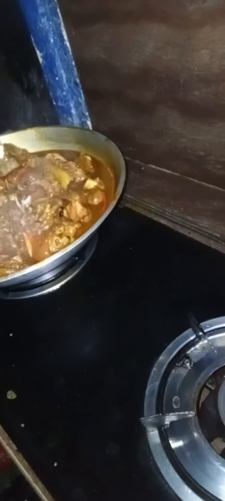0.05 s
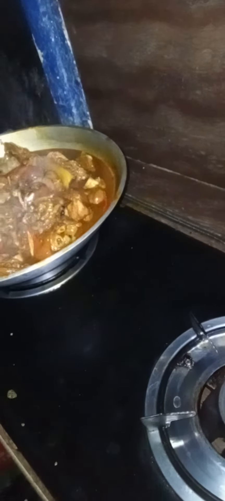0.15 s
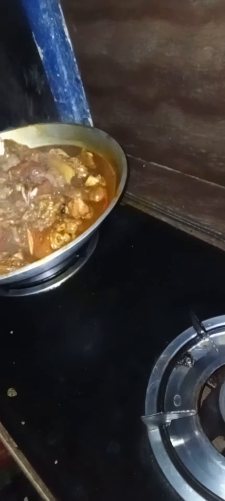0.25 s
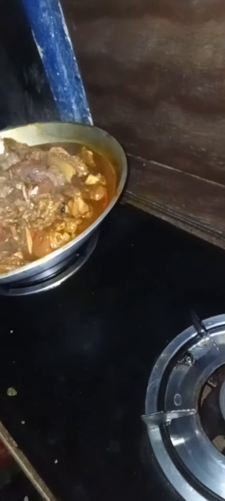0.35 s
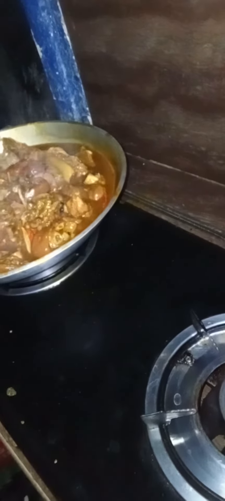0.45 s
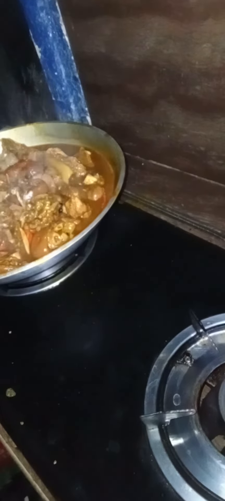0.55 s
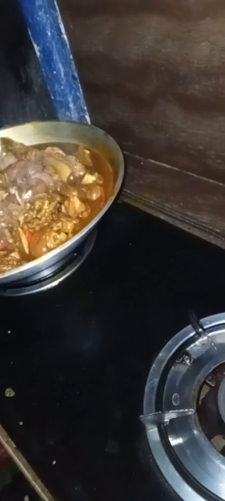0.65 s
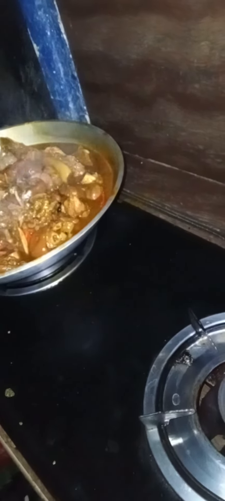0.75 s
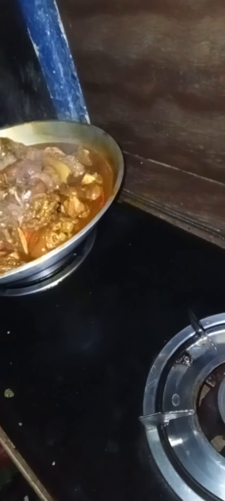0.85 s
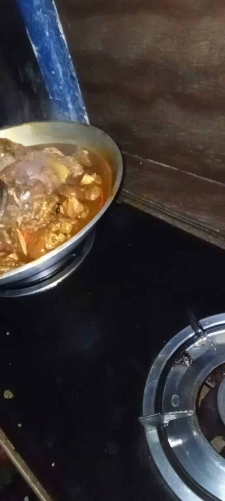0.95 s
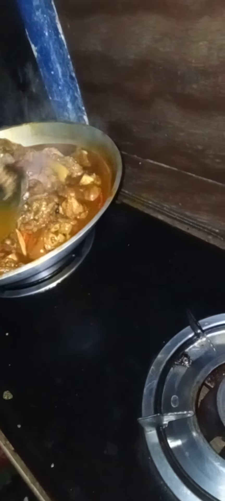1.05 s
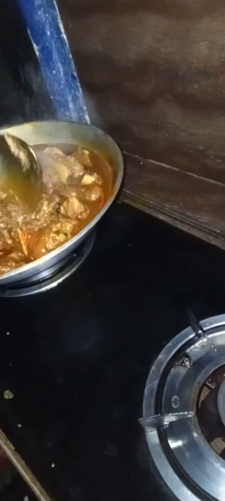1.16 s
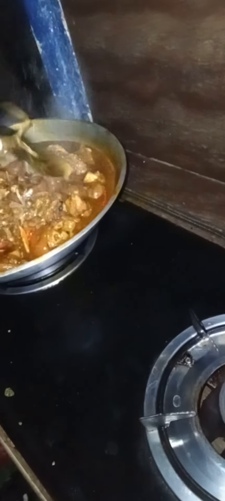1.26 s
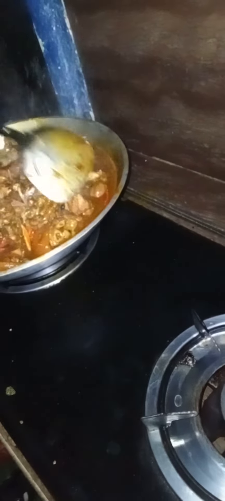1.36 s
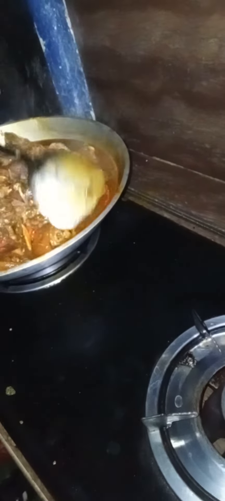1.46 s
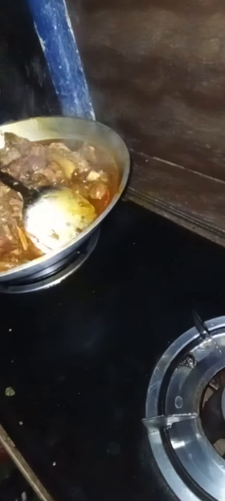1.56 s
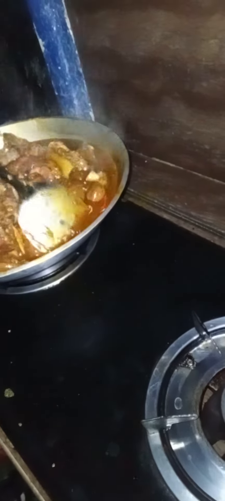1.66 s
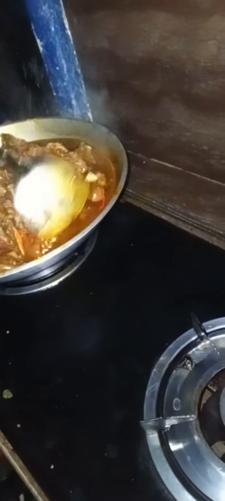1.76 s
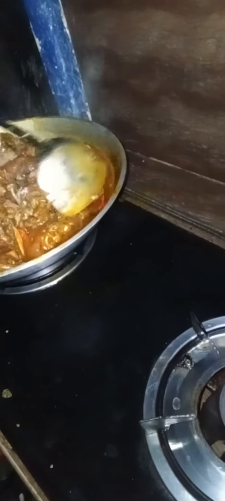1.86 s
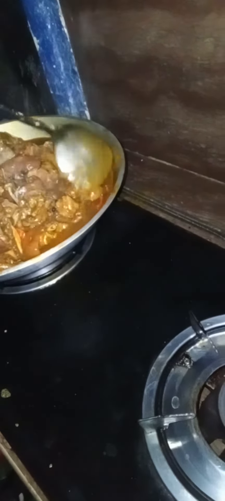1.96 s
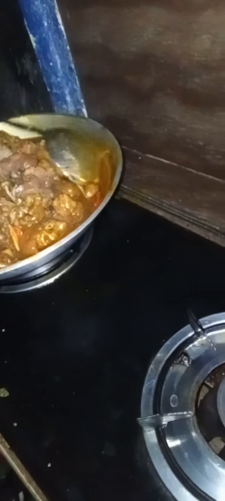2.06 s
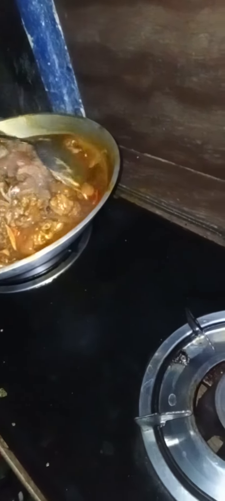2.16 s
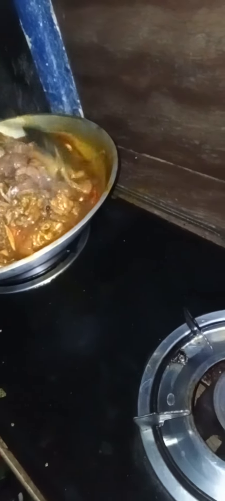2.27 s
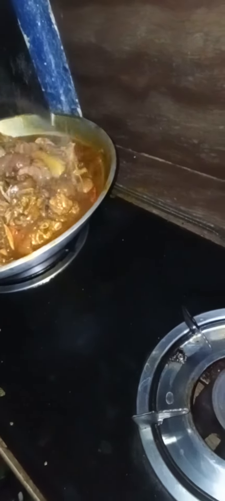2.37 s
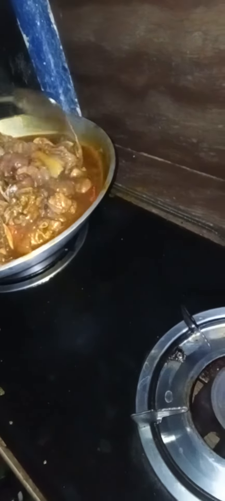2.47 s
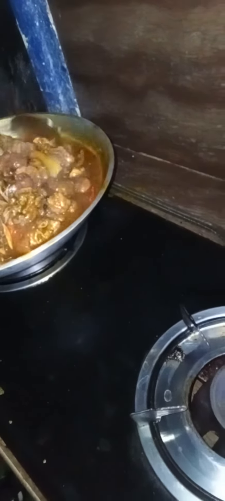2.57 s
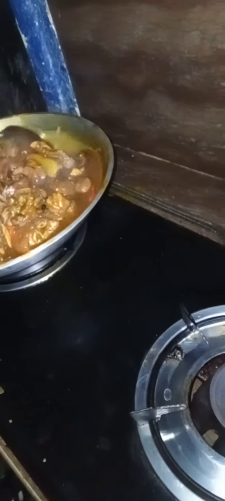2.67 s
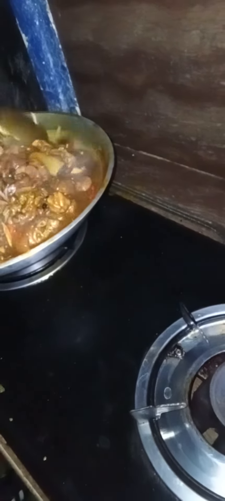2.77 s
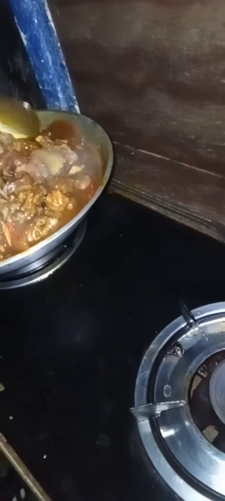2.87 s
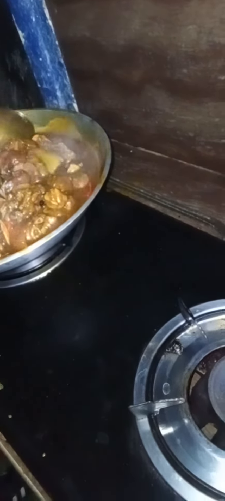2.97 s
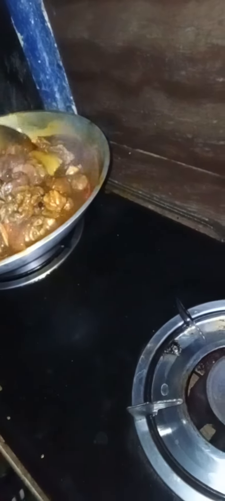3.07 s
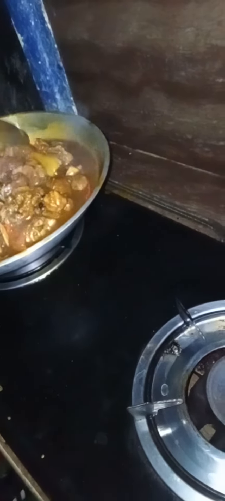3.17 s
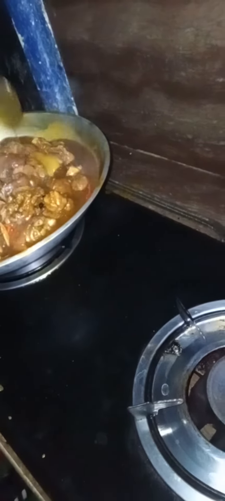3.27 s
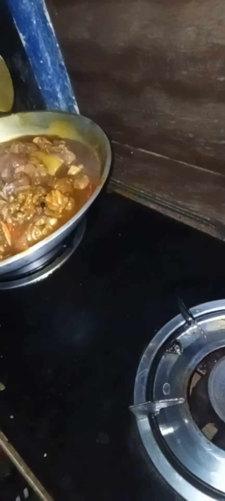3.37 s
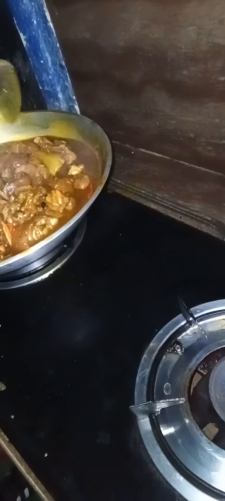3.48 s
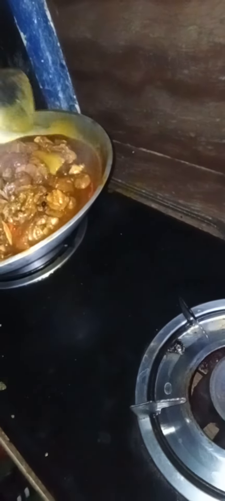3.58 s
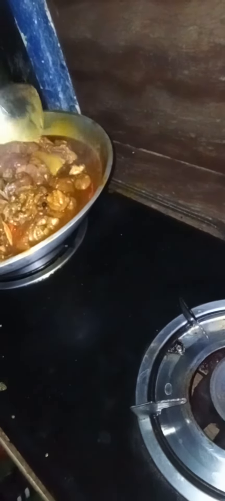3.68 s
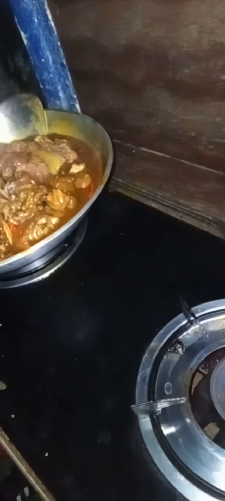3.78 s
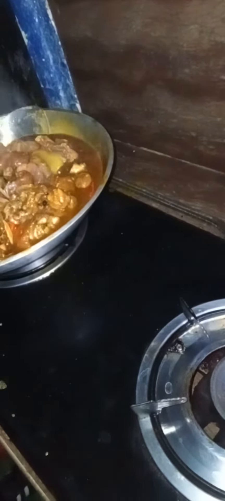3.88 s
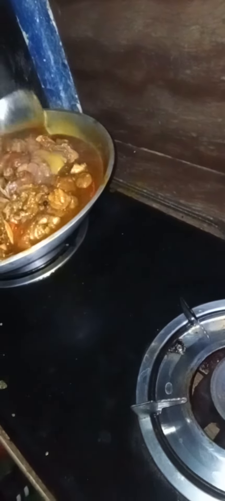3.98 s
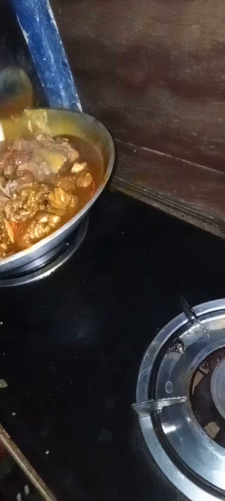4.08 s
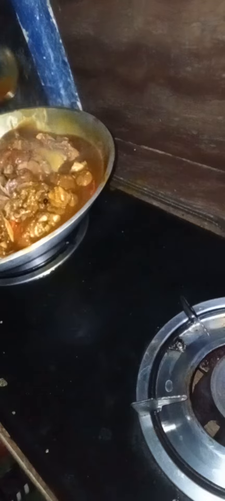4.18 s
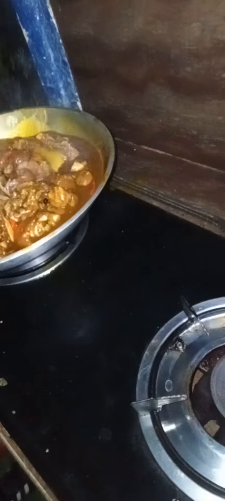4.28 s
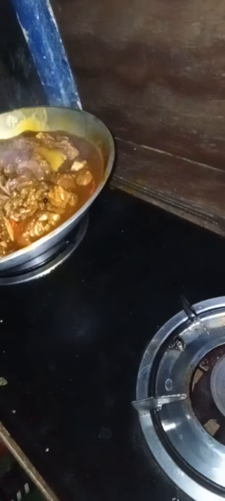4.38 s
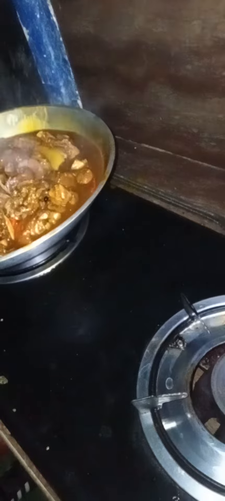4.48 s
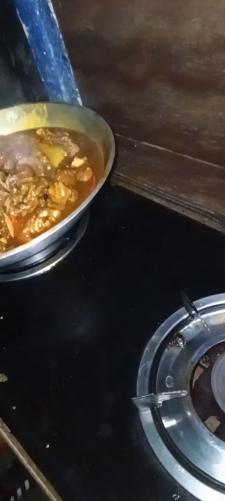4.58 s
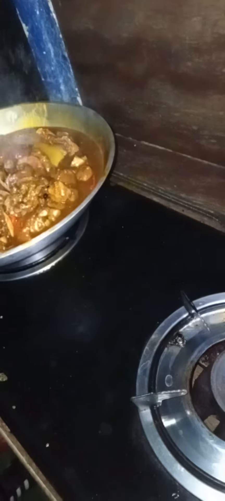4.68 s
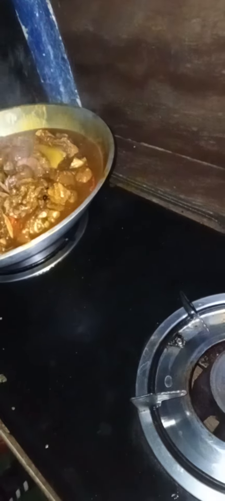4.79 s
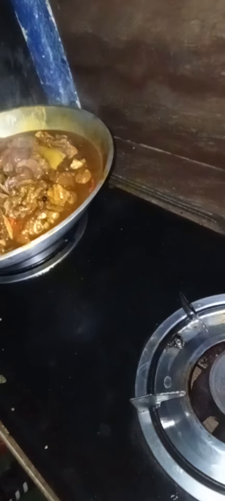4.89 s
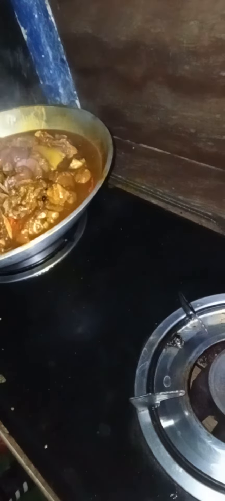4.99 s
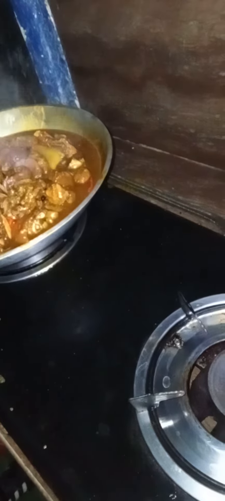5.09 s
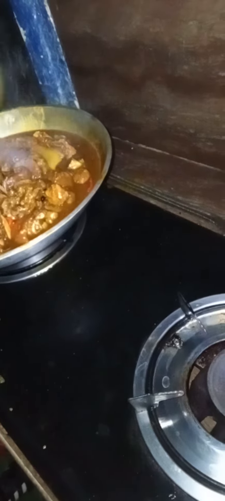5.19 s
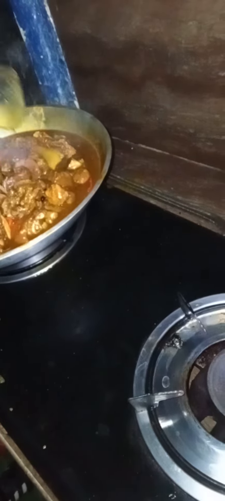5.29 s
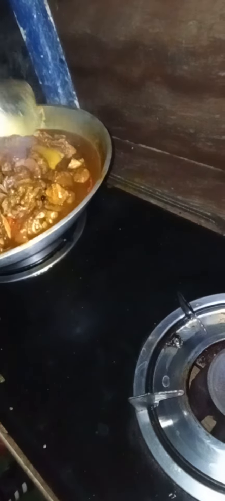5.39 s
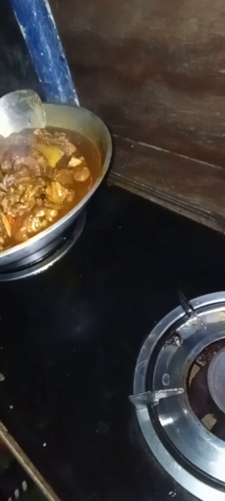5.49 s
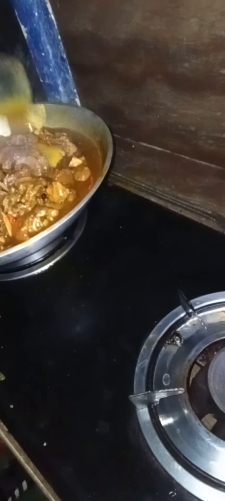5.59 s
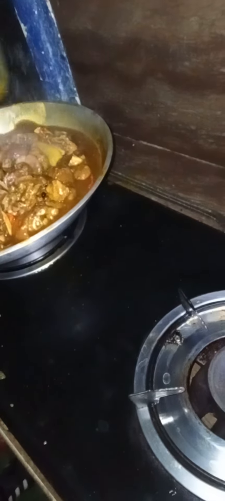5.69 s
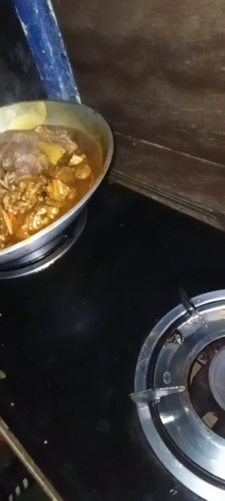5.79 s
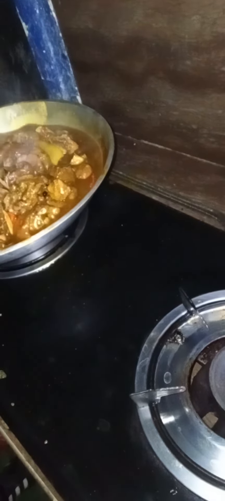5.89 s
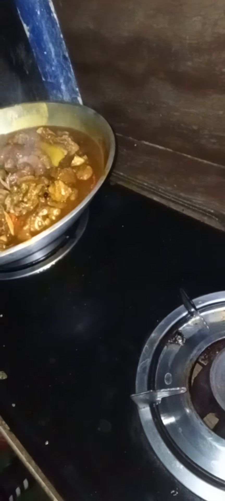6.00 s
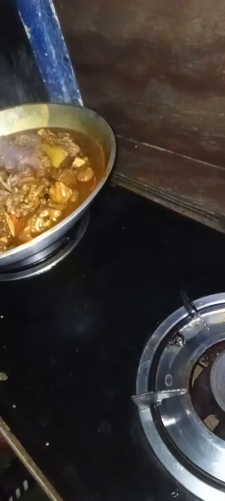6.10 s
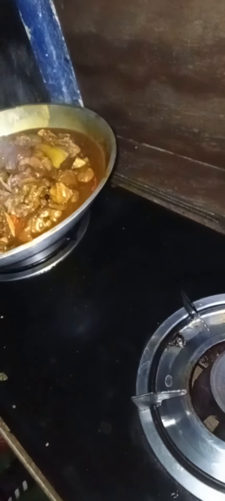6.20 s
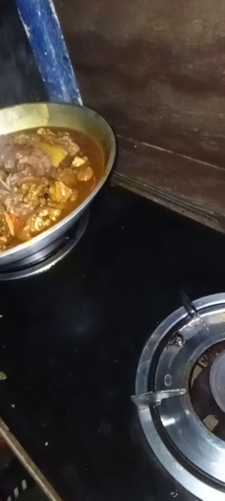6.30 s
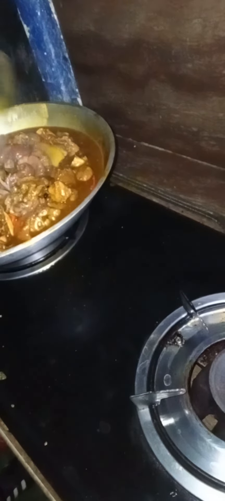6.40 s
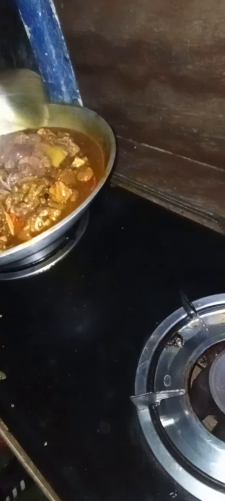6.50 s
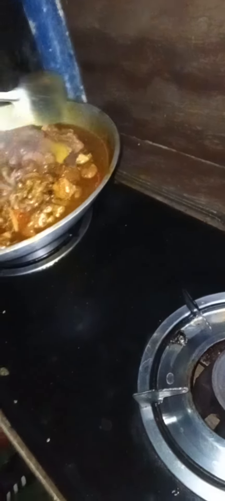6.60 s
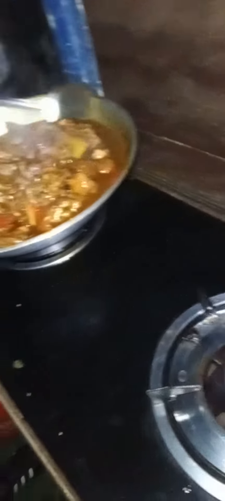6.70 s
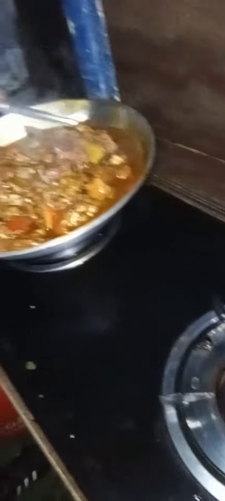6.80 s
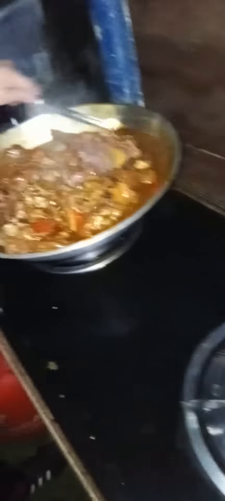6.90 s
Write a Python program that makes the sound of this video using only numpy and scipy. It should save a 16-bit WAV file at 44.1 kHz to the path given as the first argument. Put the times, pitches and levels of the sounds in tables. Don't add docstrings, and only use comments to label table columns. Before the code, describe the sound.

Thick sauce simmers with irregular wet pops in a thin metal pan while a steel spoon taps and scrapes the wall in short bursts.

```python
import sys
import numpy as np
from scipy import signal
from scipy.fft import rfft, irfft
from scipy.io import wavfile

SR = 44100
rng = np.random.default_rng(int(sys.argv[2]) if len(sys.argv) > 2 else 0)


def unload_audio(sound):
    columns = np.transpose(np.atleast_2d(sound))
    steps = np.round(np.clip(columns, -1, 1) * 32767)
    wavfile.write(sys.argv[1], SR, steps.astype(np.int16))


def voltage_ratio(level):
    return 10 ** (np.asarray(level, float) / 20)


N = 306054

# pitch_hz, density_db_per_hz
HISS_SPECTRUM = [(110, -9), (180, 1.5), (570, -7.5), (1000, -11), (1800, -11.5), (2800, -17), (3800, -13.5),
                 (5200, -16.5), (6900, -11), (7500, -17), (8000, -32.5), (10500, -30), (13300, -39),
                 (15300, -35), (16500, -39)]
# pitch_hz, density_db_per_hz
RUMBLE_SPECTRUM = [(12, -56), (20, -19), (32, -21), (55, -4), (76, 3), (115, 4.5), (179, -15), (260, -14),
                   (340, -21.5), (570, -120)]
# time_s, level_db
FLAME_DRAUGHT = [(0.0, -65), (0.11, -74), (1.68, -72), (1.93, -80), (1.97, -65), (4.93, -74), (5.14, -65.5),
                 (5.47, -66.5), (5.49, -62.5), (5.8, -57), (5.86, -71), (6.03, -62.5), (6.77, -75),
                 (6.84, -55), (6.9, -80), (6.94, -66)]
# pitch_hz, density_db_per_hz
EDGE_SPECTRUM = [(1060, -18), (1800, -38.5), (2070, 0), (2860, -2.5), (3320, 1), (4810, 0.5), (5130, 0.5),
                 (7230, 7.5), (8010, -9), (9730, -9.5), (12600, -24.5), (13800, -33), (14900, -22),
                 (16100, -21.5)]
# pitch_hz, width_hz, level_db
WALL_MODES = [(604, 350, -3.5), (722, 72, -0.5), (841, 160, -2), (898, 95, 5), (963, 110, -4.5),
              (1200, 16, 5.5), (1348, 280, -9.5), (1569, 43, 5), (1710, 37, 7), (1900, 110, 5.5),
              (2198, 70, 3)]
# pitch_hz, width_hz, level_db
SPOON_MODES = [(3010, 27, -11), (3330, 72, -10), (3760, 41, -11), (4410, 75, -9), (4610, 85, -13),
               (5190, 200, -7), (5980, 27, -4), (6160, 39, -2), (6420, 28, -6), (7260, 31, 0),
               (7500, 60, -8)]
# pitch_hz, width_hz, level_db
BOTTOM_MODES = [(330, 110, 0), (410, 90, -1), (800, 160, -2), (1200, 200, -9)]
# pitch_hz, likeness_0_to_1
LIKENESS = [(60, 1), (300, 0.91), (800, 0.3), (2000, 0.23), (5000, 0.097), (15000, 0.229)]
# pitch_hz, difference_db
LEAN = [(60, -3), (100, -3), (180, 0), (310, 0.5), (550, -0.5), (950, -3.5), (1650, 2.5), (2860, -3),
        (4970, 3), (8640, 3), (15000, -10.5)]
# pitch_hz, lead_rad
TURN = [(250, 0.49), (1000, -1), (2500, 1.58), (5000, -0.5), (9000, -8), (16000, -1.5)]
# firmest_s, pressure_db, speed_0_to_1, rise_s, fall_s
PUSHES = [(0.0, -55, 0.29, .01, 0.24), (.325, -53.5, 0.4, .12, 0.081), (1.502, -36, 0, 0.023, 0.094),
          (1.57, -60.5, 0.64, .03, 0.032), (1.668, -60.5, .02, 0.27, 0.24),
          (1.956, -42, 0.29, 0.0098, 0.063), (2.011, -47.5, 0.48, 0.049, 0.069),
          (2.045, -42, 0.29, 0.067, 0.096), (2.099, -42, 0.23, 0.14, 0.075),
          (2.181, -57.5, 0.02, 0.075, .14), (2.406, -41.5, 0.54, 0.0068, 0.22),
          (2.48, -40.5, 0.78, .04, 0.035), (2.503, -36.5, 0.64, .04, 0.093),
          (2.549, -40, 0.26, 0.15, 0.059), (2.604, -44, 0.37, 0.07, 0.096),
          (2.68, -61.5, 0.22, 0.063, 0.13), (2.889, -53.5, 0.93, 0.009, 0.024),
          (2.99, -40.5, 0.37, 0.048, 0.093), (3.028, -42.5, 0, .04, 0.11), (3.81, -61, 0.59, 0.1, 0.031),
          (5.38, -55, 0.57, 0.006, 0.053), (6.529, -45, 0.77, 0.004, 0.093),
          (6.633, -58.5, .92, 0.095, 0.087), (6.72, -60, 0.57, 0.08, 0.18)]
# peak_s, level_db, slip_rate_hz, rise_s, fall_s
STALLS = [(0.0, -71, 309.7, .01, 0.78), (0.327, -56.5, 310, 0.1, .1), (1.51, -48.5, 320, 0.016, 0.081),
          (1.975, -51, 332.2, 0.029, 0.067), (2.081, -33, 327.9, 0.053, 0.063),
          (2.13, -48, 336, .03, 0.021), (2.4, -49.5, 370.7, .004, .04), (2.555, -48, 390.5, .06, 0.038),
          (2.606, -34.5, 395.9, 0.062, 0.066), (2.99, -41, 373, 0.026, 0.12),
          (3.036, -40.5, 368.5, 0.055, 0.073), (5.376, -59, 373.2, .004, 0.11),
          (6.528, -51, 363, .004, 0.064)]
# start_s, level_db, relative_knock_db, knock_hz, t60_s
TAPS = [(0.1092, -31, -14, 920, 0.045), (0.1494, -42, -10, 1740, 0.057), (1.4806, -37, 12, 1740, 0.012),
        (1.502, -20, 0.5, 854, 0.041), (1.6428, -35, -22, 1730, 0.093), (1.948, -39, 13, 1200, 0.15),
        (2.4017, -21.5, -14.5, 1670, 0.04), (2.8853, -22.5, -6, 2180, 0.015), (2.9614, -28, -11, 760, 0.07),
        (5.3799, -23, -21, 1600, 0.013), (6.5263, -27, -17, 1200, 0.086), (6.5393, -30, 1, 1210, 0.013)]
# start_s, level_db, cavity_hz, skin_share_0_to_1
BLOOPS = [(0.659, -48, 1710, .15), (0.698, -50.5, 2100, .1), (0.716, -46, 1900, .6),
          (1.0347, -51, 1910, 0.66), (1.3234, -38, 1820, 0), (1.368, -41, 1900, .3),
          (1.546, -34, 1610, 0.5), (1.77, -39, 1510, 0.24), (1.8214, -45, 1900, .05),
          (2.2293, -40.5, 1660, 0.38), (2.796, -39.5, 2080, 0.46), (3.14, -45, 3450, 0.9),
          (3.1998, -53, 1830, 0.04), (3.7484, -44, 2230, 0.2), (3.996, -47, 1850, 0.3),
          (4.3474, -53, 1850, .53), (4.5514, -44, 1850, 0), (4.5756, -53, 2150, .1),
          (5.0087, -53, 2210, 0.2), (5.144, -49, 1875, 0.15), (5.244, -55, 1660, 0.36),
          (5.316, -50, 1640, 0.28), (6.1868, -48, 1900, 0.54), (6.207, -33.5, 3250, 0),
          (6.286, -41.5, 2110, 0.5), (6.3622, -54, 1810, 0.34), (6.4563, -51.5, 1773, .12),
          (6.825, -47, 1450, 0.18)]
# start_s, level_db, skin_hz
SNAPS = [(0.4293, -43.5, 5930), (1.0788, -47.5, 3200), (1.2186, -40, 6030), (1.4295, -37.5, 3310),
         (1.878, -41, 3200), (2.8568, -39.5, 5500), (3.31, -46, 3930), (3.343, -44.5, 3860),
         (3.397, -46, 5600), (3.4164, -38.5, 6320), (3.5067, -47, 5420), (3.6285, -43.5, 5780),
         (3.673, -51, 5850), (3.898, -40.5, 3850), (4.092, -49, 3510), (4.2063, -53.5, 3420),
         (4.231, -41.5, 3310), (4.274, -45, 4040), (4.2983, -50, 5650), (4.74, -42, 3420),
         (4.7748, -35, 3560), (4.7914, -48, 4220), (5.0493, -41, 3800), (5.4416, -45.5, 4190),
         (5.8431, -41.5, 3910), (5.9798, -40.5, 5700), (6.03, -48, 5770), (6.3024, -47.5, 3840),
         (6.3754, -48, 3370), (6.4, -44.5, 6650)]
# start_s, level_db
SPITS = [
    (0.8906, -70.5),
    (1.074, -71),
    (3.4194, -66.5),
    (3.7596, -62.5),
    (5.003, -73),
    (5.1882, -70),
    (6.361, -69.5),
]


def rms_one(x):
    return x / np.sqrt(np.mean(x ** 2) + 1e-20)


def at_hz(points, hz):
    p = np.array(points)
    return np.interp(np.log(np.maximum(hz, 1)), np.log(p[:, 0]), p[:, 1])


def drift(rate):
    r = np.exp(-80 * np.pi * rate / SR)
    steps = rng.standard_normal(N // 40 + 2002)
    slow = signal.lfilter([1], [1, -2 * r, r * r], steps)[2000:]
    return np.interp(np.arange(N) / 40, np.arange(len(slow)), rms_one(slow))


def grains(per_s, spread_db):
    sizes = voltage_ratio(spread_db * np.minimum(rng.exponential(1, (2, N)), 4))
    sizes = sizes * rng.choice([-1, 1], (2, N))
    return sizes * (rng.random((2, N)) < per_s / SR)


def stereo(pair, spectrum=None):
    hz = np.fft.rfftfreq(N, 1 / SR)
    alike = np.clip(at_hz(LIKENESS, hz), 0, 1)
    lean = voltage_ratio(at_hz(LEAN, hz) / 2) * np.exp(.5j * at_hz(TURN, hz))
    colour = 1 if spectrum is None else voltage_ratio(at_hz(spectrum, hz))
    mid, side = rfft(pair) * colour
    mid, side = np.sqrt(1 + alike) * mid, np.sqrt(1 - alike) * side
    return rms_one(irfft([(mid + side) * lean, (mid - side) / lean], N))


def resonate(x, hz, width_hz):
    r = np.exp(-np.pi * max(width_hz, 10) / SR)
    poles = [1, -2 * r * np.cos(2 * np.pi * hz / SR), r * r]
    return signal.lfilter([(1 - r * r) / 2, 0, (r * r - 1) / 2], poles, x + 1e-18)


def body(x, modes, wander_db, centre_hz=None):
    out = 0
    for k, (hz, width_hz, db) in enumerate(modes):
        near_db = 0
        if centre_hz is not None:
            near_db = -14 * np.minimum(np.abs(np.log2(hz / centre_hz)), 1.3)
        gain = voltage_ratio(db + near_db + wander_db * drift(21))
        out = out + (-1) ** k * gain * resonate(x, hz, width_hz)
    return out


def panned(db):
    return voltage_ratio(np.array([[db / 2], [-db / 2]]))


def patchy(x, patch_db):
    edges = np.geomspace(120, 18000, 13)
    out = 0
    for edge in zip(edges, edges[1:]):
        band = signal.sosfilt(signal.butter(2, edge, "band", fs=SR, output="sos"), x)
        out = out + voltage_ratio(patch_db * drift(16)) * band
    return rms_one(out)


def burner():
    white = rng.standard_normal((3, 2, N))
    air = patchy(stereo(white[0], HISS_SPECTRUM), patch_db=1.2)
    hiss = voltage_ratio(-70.5 + 1.0 * drift(22.2)) * air
    whistle = voltage_ratio(-83.0) * stereo(body(white[1], [(683.7, 15, 0)], wander_db=1.0))
    s, db = np.transpose(FLAME_DRAUGHT)
    draught_db = np.interp(np.arange(N) / SR, s, db)
    flicker_db = 3.4 * drift(21) + 2.54 * drift(3.4)
    return hiss + whistle + voltage_ratio(draught_db + flicker_db) * stereo(white[2], RUMBLE_SPECTRUM)


def fizz():
    per_s = 380 * voltage_ratio(4.4 * drift(10.0))
    clicks = np.abs(grains(per_s, spread_db=4.5)[0])
    dealt = rng.integers(0, 18, N)
    white, fade = rng.standard_normal((2, N)), voltage_ratio(-60 / (.06 * SR))
    rings = 0
    for k, hz in enumerate(np.geomspace(900, 10500, 18)):
        puff = white * signal.lfilter([1], [1, -fade], clicks * (dealt == k) + 1e-18)
        rings = rings + resonate(resonate(puff, hz, hz / 15), hz, hz / 4.0)
    return voltage_ratio(-72) * stereo(rings, HISS_SPECTRUM)


def swell(s, db, rise_s, fall_s):
    t = np.arange(N) / SR - s
    away = np.where(t < 0, -t / max(rise_s, .001), t / max(fall_s, .001))
    return voltage_ratio(db - 28.5 * np.minimum(away, 5) ** 1.296)


def stroke_controls():
    slow_edge_db, speed_edge_db = -11, 33
    slow_ring_hz, speed_octaves = 740, 1.02
    speed = np.array(PUSHES)[:, 2:3]
    wall = np.array([swell(s, db, rise_s, fall_s) for s, db, _, rise_s, fall_s in PUSHES]) ** 2 + 1e-30
    edge = np.sum(wall * voltage_ratio(slow_edge_db + speed_edge_db * speed) ** 2, axis=0)
    groan = np.sum([swell(s, db, rise_s, fall_s) ** 2 for s, db, _, rise_s, fall_s in STALLS], axis=0)
    mean_speed = np.sum(wall * speed, axis=0) / wall.sum(axis=0)
    centre_hz = slow_ring_hz * 2 ** (speed_octaves * mean_speed)
    return np.sqrt(groan), np.sqrt(wall.sum(axis=0)), np.sqrt(edge), centre_hz


def scrape():
    groan, wall, edge, centre_hz = stroke_controls()
    slip_hz = np.interp(np.arange(N) / SR, *np.array(STALLS)[:, [0, 2]].T)
    phase = np.cumsum(slip_hz * (1 + 0.076 * drift(25)) / SR)
    slips = np.diff(np.floor(phase), prepend=0) * voltage_ratio(4.2 * rng.standard_normal(N))
    slips = rms_one(slips) * [[1], [0]] + 0.51 * rng.standard_normal((2, N))
    grit = rms_one(grains(2000, spread_db=2.6))
    bright = patchy(stereo(grit, EDGE_SPECTRUM), patch_db=1.9)
    bright = rms_one(bright + .75 * stereo(body(grit[::-1], SPOON_MODES, wander_db=3.0)))
    top = signal.sosfilt(signal.butter(4, 8500, "high", fs=SR, output="sos"), bright)
    bright = bright + top * (np.sqrt(np.abs(edge) / voltage_ratio(-52.5)) - .45)
    bottom = stereo(body(slips, BOTTOM_MODES, wander_db=1.5))
    ring = stereo(body(grit, WALL_MODES, wander_db=2.5, centre_hz=centre_hz))
    skipping = voltage_ratio(1.1 * drift(47)) * edge
    return groan * bottom + wall * ring + skipping * bright


def taps():
    white, t, out = rng.standard_normal((2, N)), np.arange(4000) / SR, np.zeros((2, N))
    rattle = stereo(body(white[::-1], SPOON_MODES, wander_db=4))
    high = rms_one(stereo(white, EDGE_SPECTRUM) + .4 * rattle)
    low = rms_one(stereo(body(white, WALL_MODES, wander_db=-2.0)) + 0.97 * stereo(white))
    thin = signal.butter(4, 1400, "high", fs=SR, output="sos")
    for s, db, knock_db, knock_hz, t60 in TAPS:
        i = round(s * SR)
        span = slice(i, i + len(t))
        fade = voltage_ratio(-60 * t / max(t60, .005)) + .8 * voltage_ratio(-60 * t / .007)
        fade = fade * np.minimum(t / .0004, 1)
        crack = signal.sosfilt(thin, fade * high[:, span])
        knock = resonate(fade * low[:, span], knock_hz, knock_hz / 3)
        knock = 4 * voltage_ratio(knock_db) * resonate(knock, knock_hz, knock_hz / 2)
        out[:, span] += voltage_ratio(db - 9.5) * panned(1.9) * (crack + knock)
    return out


def bubbles():
    rows = [(s, db, hz, 2.03 * hz, share) for s, db, hz, share in BLOOPS]
    rows += [(s, db, 1900 * 2 ** rng.normal(0, 0.3), hz, 1) for s, db, hz in SNAPS]
    placed = []
    for row in rows:
        pan_db = 1.3 + 0.5 * np.log2(row[3] / 3600) + rng.normal()
        placed.append((*row, pan_db))
    return placed


def pops():
    spray = stereo(grains(1100, spread_db=4.5), EDGE_SPECTRUM)
    t, out = np.arange(4000) / SR, np.zeros((2, N))
    white = stereo(rng.standard_normal((2, N)))
    fade = np.minimum(t / 0.0014, 1) * (voltage_ratio(-60 * t / 0.044) + 0.23 * voltage_ratio(-60 * t / 0.14))
    for s, db, cavity_hz, skin_hz, share, pan_db in bubbles():
        i = round(s * SR)
        span = slice(i, i + len(t))
        puff = fade * white[:, span]
        cavity, skin = (resonate(resonate(puff, hz, hz / 16), hz, hz / 1.8) for hz in (cavity_hz, skin_hz))
        skin_share = np.clip(share, 0, 1)
        ring = np.sqrt(1.02 - skin_share ** 2) * rms_one(cavity) + skin_share * rms_one(skin)
        droplets = voltage_ratio(5) * (skin_share + 0.098) * fade * spray[:, span]
        out[:, span] += voltage_ratio(db - 26) * panned(pan_db) * (ring + droplets)
    return out


def spits():
    spit_hz, t60_s = 10300, 0.016
    puffs = np.zeros(N)
    puffs[[round(s * SR) for s, db in SPITS]] = voltage_ratio(np.array(SPITS)[:, 1] + 30)
    puffs = signal.lfilter([1], [1, -voltage_ratio(-60 / (t60_s * SR))], puffs + 1e-18)
    puffs = puffs * stereo(rng.standard_normal((2, N)))
    return resonate(resonate(puffs, spit_hz, 224), spit_hz, 600)


def kitchen(x):
    t60_s, level_db = .11, -9
    t = np.arange(8000) / SR
    tail = rng.standard_normal((2, len(t))) * voltage_ratio(-60 * t / t60_s) * (t > .003)
    tail = signal.sosfilt(signal.butter(1, 700, "high", fs=SR, output="sos"), tail)
    tail = tail / np.sqrt(np.sum(tail[0] ** 2))
    return voltage_ratio(level_db) * signal.fftconvolve(x, tail, axes=1)[:, :N]


def scene():
    pan = fizz() + scrape() + taps() + pops() + spits()
    return burner() + pan + kitchen(pan)


def top_cut(x):
    return signal.sosfilt(signal.butter(12, 16830, fs=SR, output="sos"), x)


def record(dry):
    mix = signal.sosfilt(signal.butter(1, 40, "high", fs=SR, output="sos"), dry)
    mix = signal.sosfilt(signal.cheby2(12, 70, 16550, fs=SR, output="sos"), mix)
    return top_cut(mix)


dry = scene()
out = record(dry)
unload_audio(out)
```